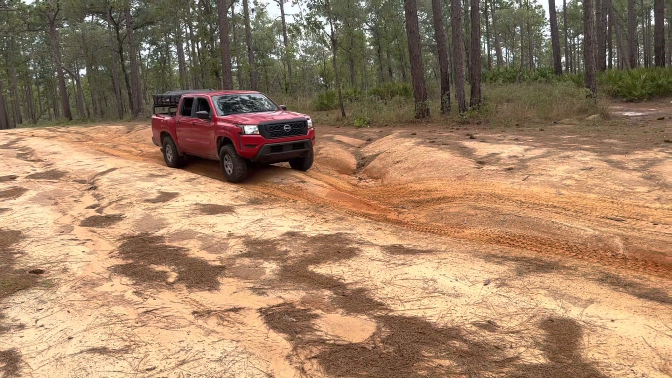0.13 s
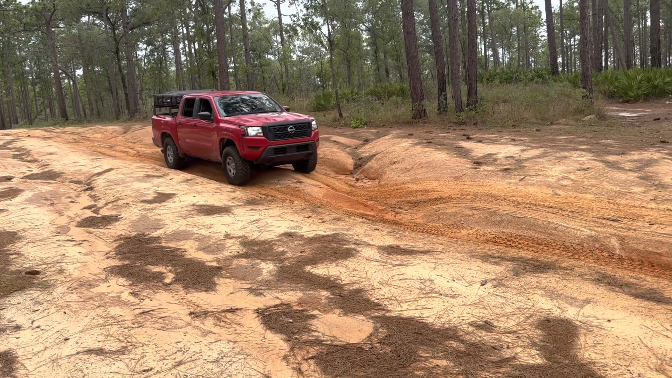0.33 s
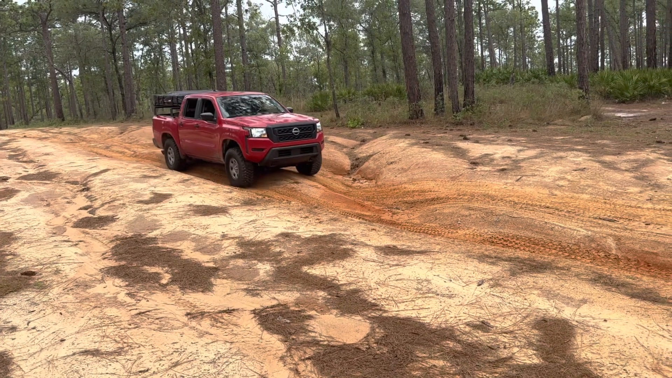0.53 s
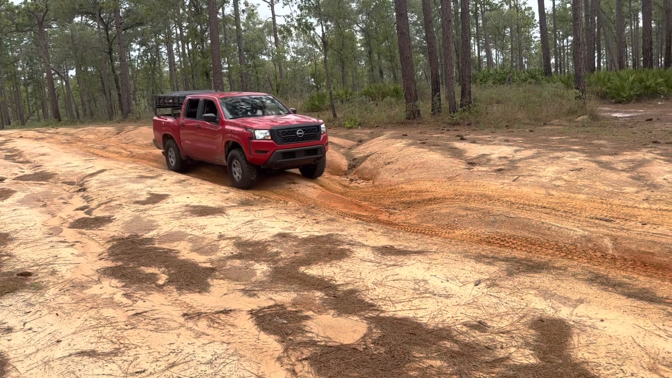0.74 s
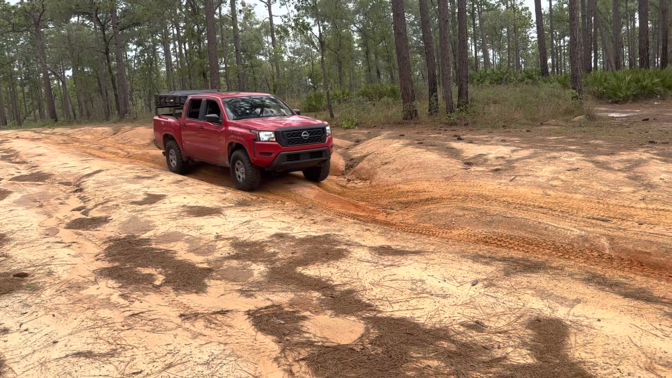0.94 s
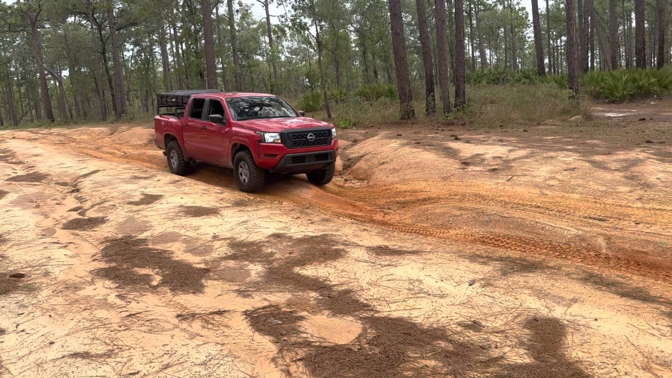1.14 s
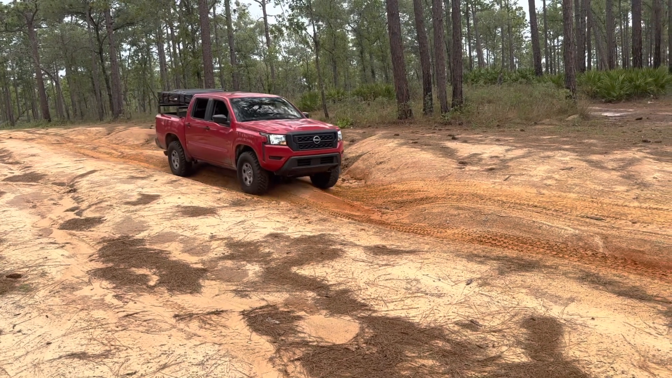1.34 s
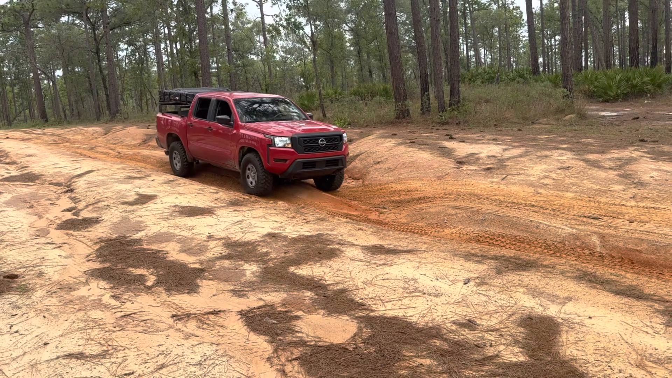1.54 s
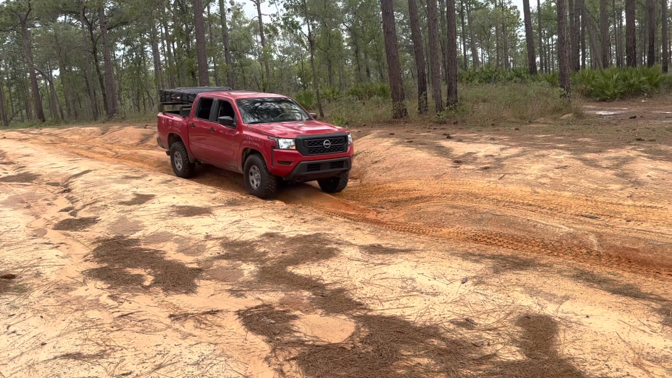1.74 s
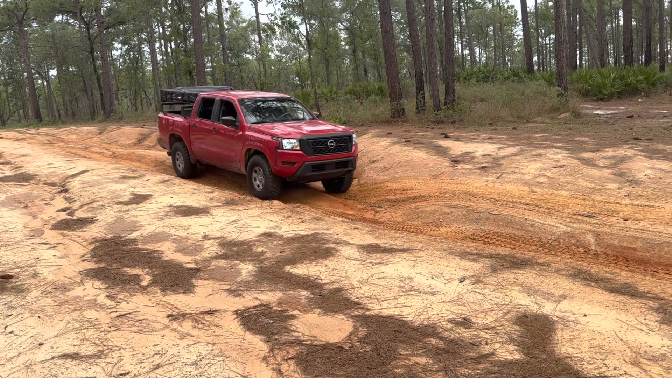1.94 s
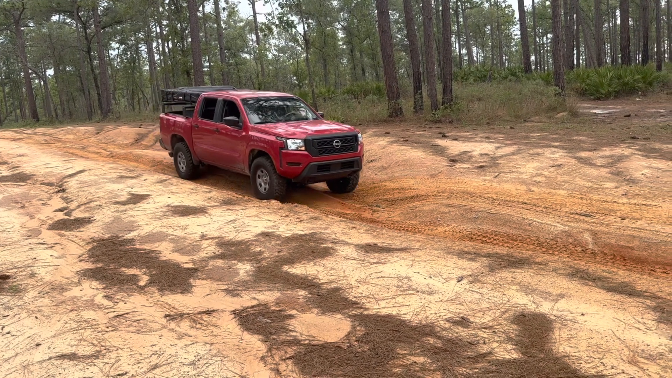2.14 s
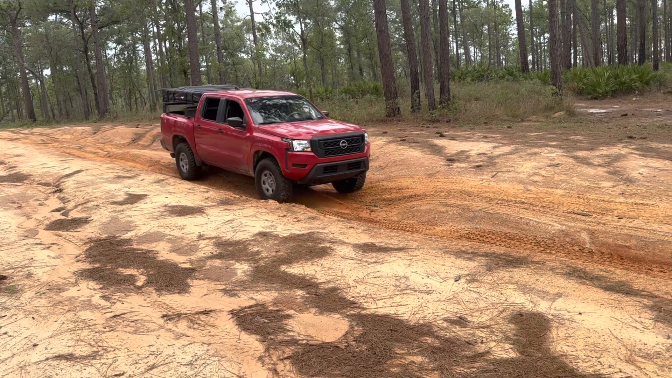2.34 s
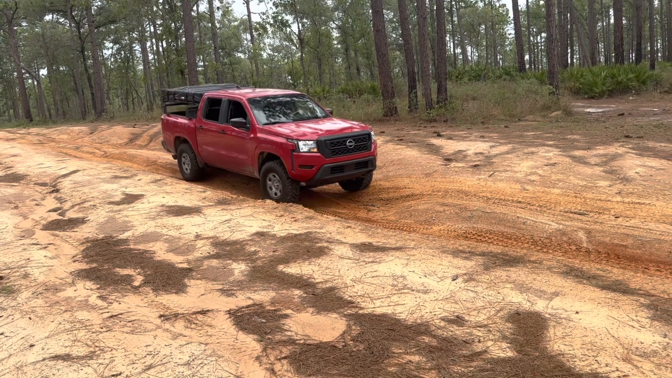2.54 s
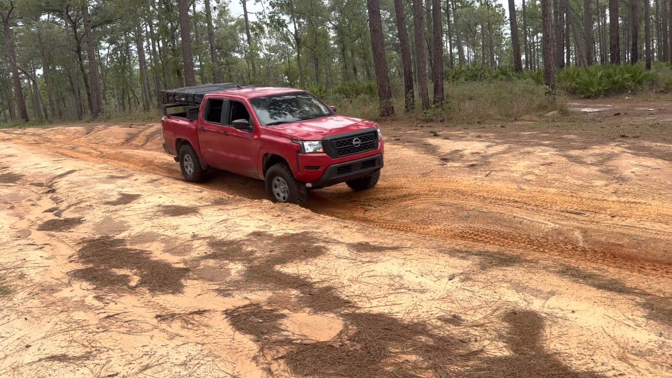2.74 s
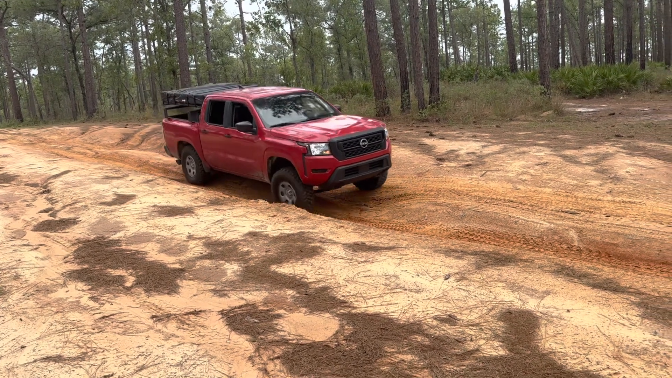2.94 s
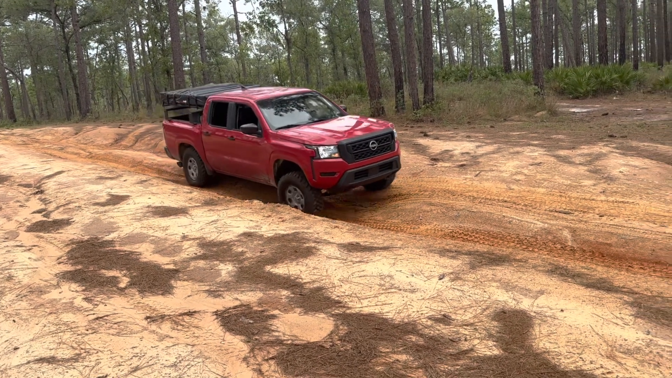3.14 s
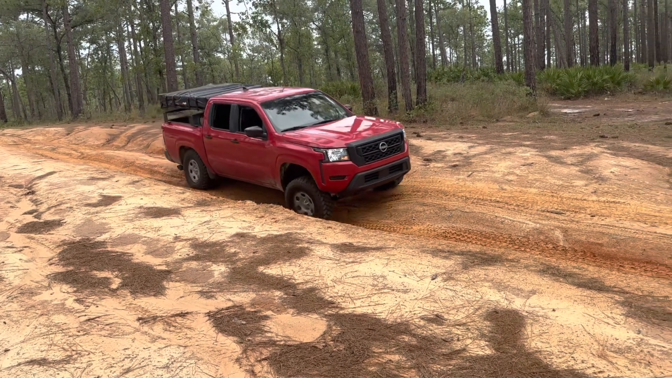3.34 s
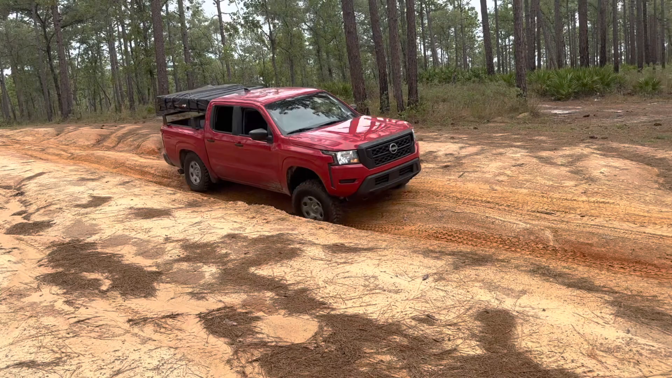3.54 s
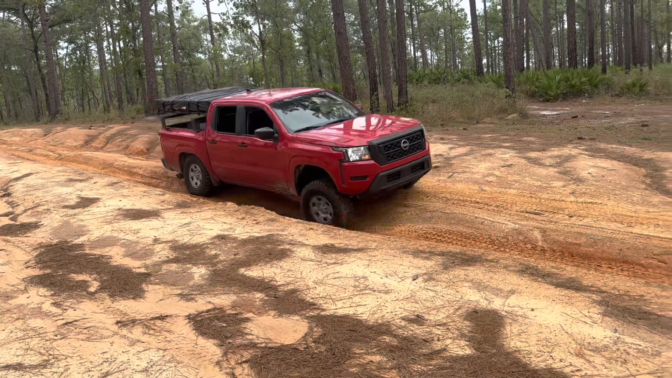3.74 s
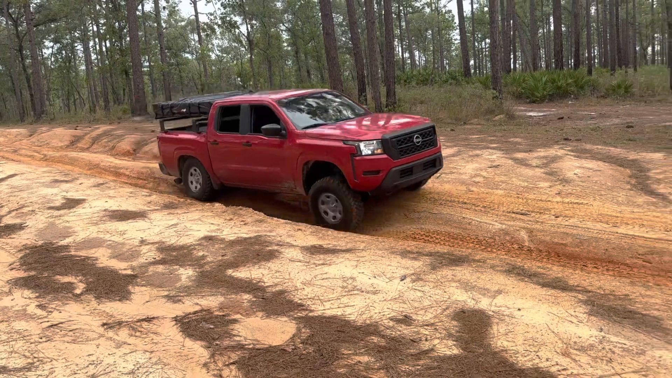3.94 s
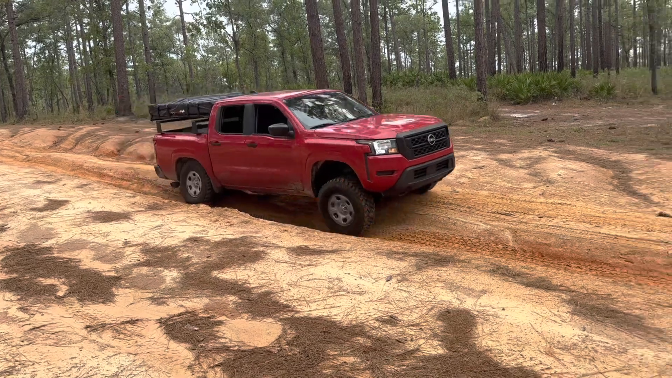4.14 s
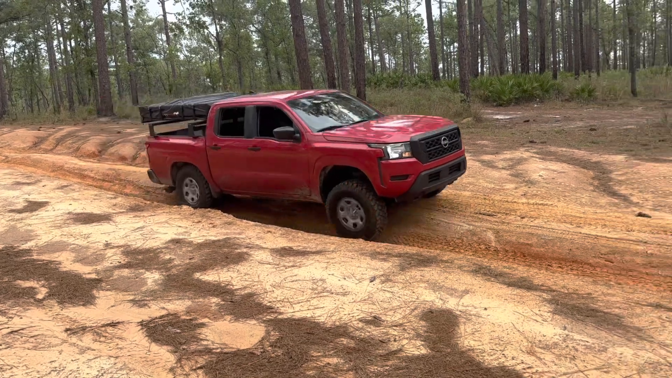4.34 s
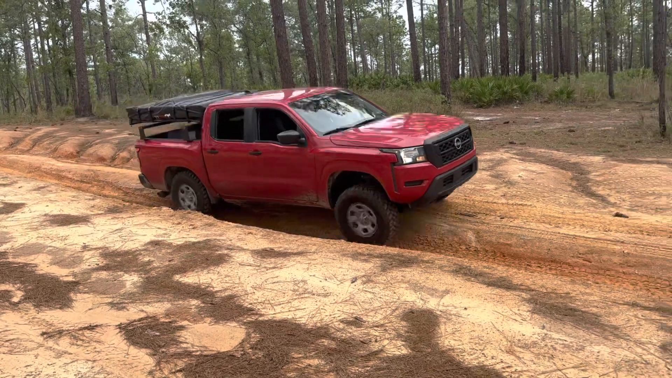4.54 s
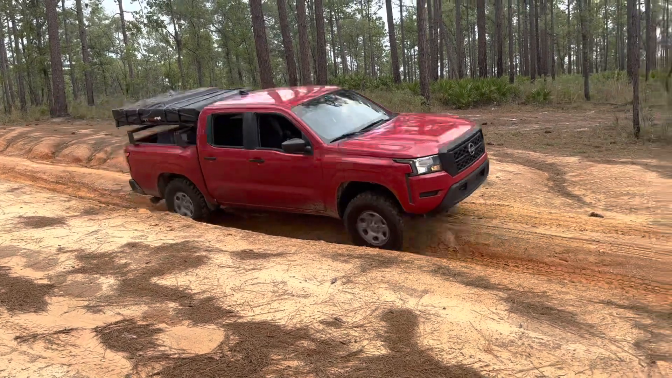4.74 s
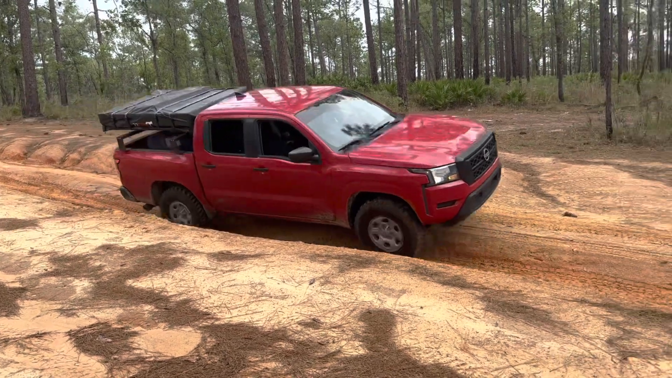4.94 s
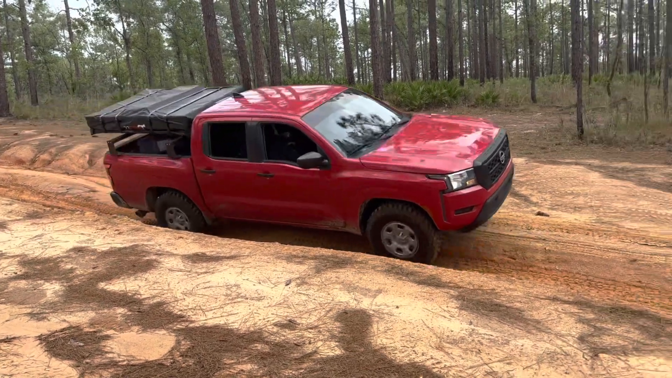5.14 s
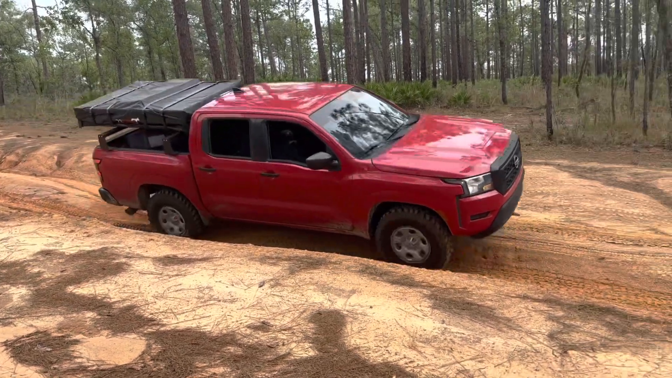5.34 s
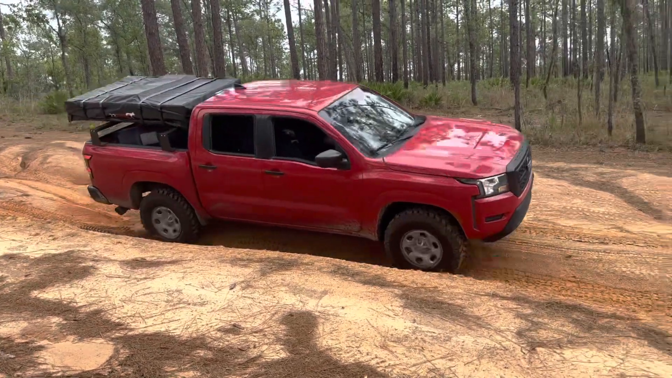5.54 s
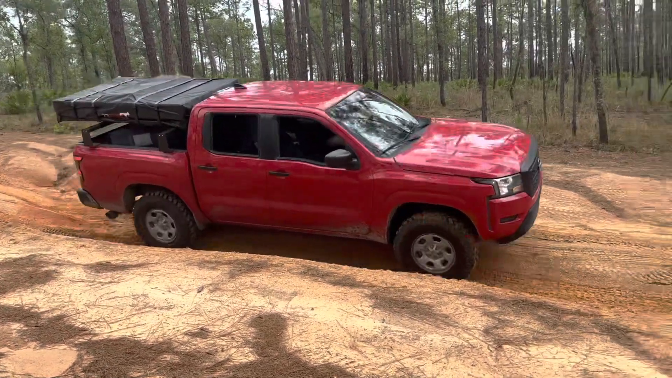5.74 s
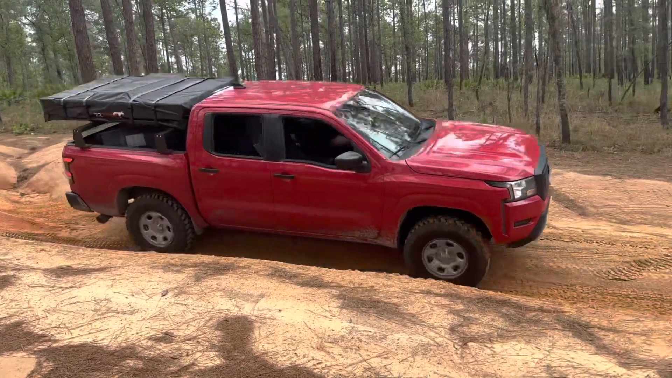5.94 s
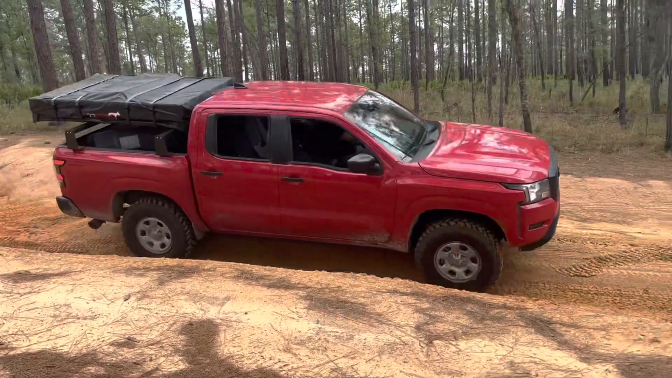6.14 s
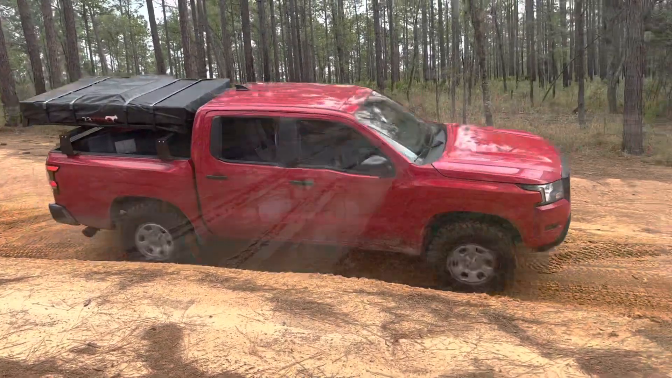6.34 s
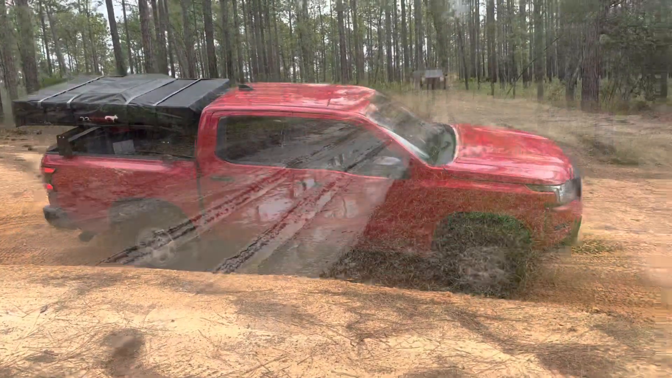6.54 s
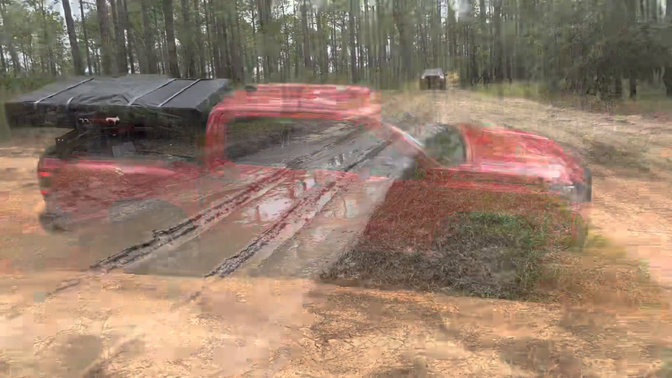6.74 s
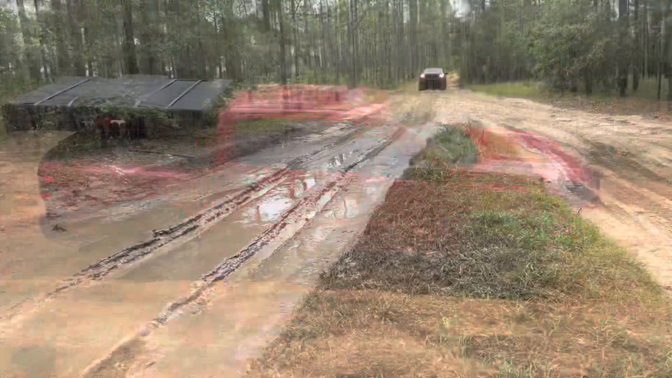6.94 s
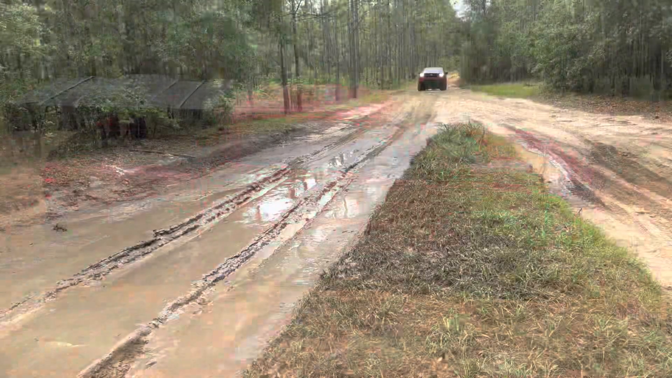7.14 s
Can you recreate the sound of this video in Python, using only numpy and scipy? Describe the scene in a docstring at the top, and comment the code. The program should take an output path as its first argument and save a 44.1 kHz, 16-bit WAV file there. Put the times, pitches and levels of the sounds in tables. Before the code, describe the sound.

Outdoors among trees, with faint crickets behind it, a low, throbbing truck engine approaches at a crawl. It sags at idle, then picks up a little speed, with light ticking and a whirring fan. The tyres hiss and crunch over sand while the body knocks and rattles in the ruts, loudest close to the microphone. Finally the near truck blends into a more distant engine hum.

```python
"""A rutted clay trail in a pine wood. A six-cylinder pickup crawls nearer, idling, then pulling gently.
Its firings make the exhaust hum and the injectors tick, its fan roars, and sand crunches under the tyres.
The ruts make the body knock and ring, while crickets and a katydid sing in the trees.
At the end the sound fades into an engine farther away on another stretch of the trail."""
import sys
import numpy as np
from scipy import signal
from scipy.fft import rfft, irfft
from scipy.io import wavfile
from scipy.ndimage import uniform_filter1d, map_coordinates

SR = 44100
rng = np.random.default_rng(int(sys.argv[2]) if len(sys.argv) > 2 else 0)


def store_pcm(level_fs):
    """Save levels as 16-bit WAV."""
    pcm = np.round(np.clip(level_fs, -1, 1) * 32767).astype(np.int16)
    wavfile.write(sys.argv[1], SR, np.atleast_2d(pcm).T)


N = 317070
TIME = np.arange(N) / SR
FREQS_HZ = np.fft.rfftfreq(N, 1 / SR)

# the near engine's speed, sagging at idle and then picking up: time_s, firings_per_s
ENGINE_SPEED = [(0, 36.4), (.3, 35.7), (.8, 33.3), (1.17, 31.6), (1.6, 32.05), (2.17, 32.3), (2.6, 35.2),
                (3, 39.9), (3.4, 45.2), (3.7, 47.4), (4.1, 49), (4.5, 49.15), (4.95, 50.5), (5.25, 50.6),
                (5.65, 48.2), (6.25, 49), (6.75, 49.9), (7.19, 49.3)]


def gain_of(db):
    """Turns decibels into a number to multiply a sound by."""
    return 10 ** (np.asarray(db) / 20)


def normalised(x):
    """Scales a signal to an average strength (rms) of 1."""
    return x / np.sqrt(np.mean(x ** 2) + 1e-20)


def at_pitch(table, hz):
    """Looks up a table's value at hz, on a scale of octaves."""
    pitches, values = np.transpose(table)
    return np.interp(np.log(hz + 1), np.log(pitches + 1), values)


def over_time(table):
    """Joins a table's points in time with straight lines."""
    return np.interp(TIME, *np.transpose(table))


def wander(rate_hz):
    """A random wobble of strength 1; a higher rate makes it quicker."""
    return normalised(irfft(rfft(rng.standard_normal(N)) * np.exp(-(FREQS_HZ / rate_hz) ** 2), N))


def swell(time_s, half_s):
    """A smooth rise and fall that reaches 1 at time_s."""
    return np.exp(-((TIME - time_s) / half_s) ** 2)


def fuzzy_tone(hz, width_hz):
    """A tone blurred by noise; more width makes it rougher."""
    angle = 2 * np.pi * np.cumsum(hz * np.ones(N)) / SR
    return wander(width_hz) * np.cos(angle) + wander(width_hz) * np.sin(angle)


def shaped_noise(spectrum, source=None, peaks=()):
    """Stereo noise (or a given source) with its lows and highs shaped by a spectrum and extra peaks."""
    # how alike left and right are, 1 being the same: pitch_hz, likeness
    stereo_likeness = [(30, 0.75), (100, 0.94), (300, .97), (600, 0.85), (1300, 0.92), (3000, 0.76),
                       (6000, 0.35), (7500, .96), (8500, .96), (10000, 0.76), (12000, .98), (15500, 0.3)]
    first, second = rfft(rng.standard_normal((2, N)) if source is None else source)
    likeness = at_pitch(stereo_likeness, FREQS_HZ)
    mid, side = first * np.sqrt(1 + likeness), second * np.sqrt(1 - likeness)
    lift = 1 + sum((gain_of(db) - 1) / (1 + (2 * (FREQS_HZ - hz) / width) ** 2) for hz, width, db in peaks)
    shape = lift * gain_of(at_pitch(spectrum, FREQS_HZ))
    return normalised(irfft(np.array([mid + side, mid - side]) * shape, N))


def nearness_db(reference_m=7.5):
    """The truck gains 6 dB each time its distance halves."""
    # the truck's approach: time_s, distance_m
    distance = [(0, 19.1), (2.1, 17.9), (3, 15.7), (3.7, 11.8), (4.5, 8.2), (5.4, 9), (6.3, 6.8)]
    return 20 * np.log10(reference_m / over_time(distance))


def crossfade(start_s=6.365, fade_out_s=0.81, fade_in_s=0.55):
    """Two gains: the near stretch of trail fading out and the far one fading in."""
    since = TIME - start_s
    return np.clip(1 - since / fade_out_s, 0, 1), np.clip(since / fade_in_s, 0, 1)


def near_then_far(near_db, far_db):
    """The gain of a sound that is heard on both stretches."""
    fade_out, fade_in = crossfade()
    return np.hypot(fade_out * gain_of(near_db), fade_in * gain_of(far_db))


def air(level_db=-81):
    """A faint, steady hiss lies over the whole wood."""
    # the hiss: pitch_hz, level_db
    spectrum = [(6000, -2), (9500, 4), (11500, -17), (14500, -14), (16000, -8)]
    return gain_of(level_db) * shaped_noise(spectrum)


def insects(chorus_db=-64, strokes_per_s=47, top_hz=7350, fall_hz=550):
    """Crickets sing to the left, and a katydid buzzes, each wing stroke falling in pitch."""
    # the cricket chorus: pitch_hz, level_db
    cricket_spectrum = [(5500, -48), (6500, -13), (7000, -1), (7500, 5.5), (7850, 2), (8300, -10.5),
                        (9200, -66)]
    # the katydid's buzzes: start_s, end_s, level_db
    buzzes = [(-.05, 0.203, -66.5), (1.046, 1.35, -67.5), (1.332, 1.638, -63)]
    chorus = shaped_noise(cricket_spectrum) * near_then_far(chorus_db, far_db=-69)
    chorus *= gain_of(1.4 * wander(82))
    stroke = TIME * strokes_per_s % 1
    pitch_hz = top_hz - fall_hz * stroke + 110 * wander(660)
    tone = np.sin(2 * np.pi * np.cumsum(pitch_hz) / SR)
    level = sum(gain_of(db) * np.clip(np.minimum(TIME - start, end - TIME) / 0.024, 0, 1)
                for start, end, db in buzzes)
    katydid = level * normalised(tone * np.sin(np.pi * stroke) ** 4)
    return chorus * gain_of([[3], [-3.5]]) + katydid * gain_of([[1], [-1]])


def tree_echo(sound, fall_db_per_s=60, delay_s=0.0011):
    """The trunks scatter the sound into a half-second tail, different on each side."""
    t = np.arange(SR // 2) / SR
    tail = rng.standard_normal((2, len(t))) * gain_of(-fall_db_per_s * t) * (t > delay_s)
    return signal.fftconvolve(sound, tail / np.linalg.norm(tail[0]), axes=1)[:, :N]


def gravel_and_whistle():
    """Gravel grates in two spells, and the fan briefly whistles between them."""
    # gravel, fan whistle, gravel: start_s, end_s, pitch_hz, width_hz, level_db
    spells = [(2.146, 2.952, 2047, 290, -66), (2.553, 3.25, 1093, 70, -66), (3.1, 3.949, 1838, 330, -63.5)]
    out = np.zeros(N)
    for start, end, hz, width_hz, db in spells:
        progress = np.clip((TIME - start) / (end - start), 0, 1)
        out += gain_of(db) * np.sin(np.pi * progress) * fuzzy_tone(hz, width_hz)
    return out


def low_groans():
    """Low groans swell and slide as the truck rolls; the last is the exhaust's overtone ringing out."""
    # the groans: start_s, end_s, first_hz, last_hz, width_hz, level_db
    groans = [(0, 1.073, 306.4, 281, 13, -57.5), (3, 4.198, 429.2, 400.6, 89, -57),
              (3.098, 3.998, 304.7, 297.6, 24, -57), (4.154, 4.615, 360, 328.5, 100, -51),
              (4.397, 5.44, 280, 288, 28, -50.5), (5.71, 6.339, 281, 321.2, 17, -47.5),
              (6.063, 6.642, 323, 317, 14, -47.5), (6.268, 6.912, 292, 302.4, 6, -51.5)]
    out = np.zeros(N)
    for start, end, first_hz, last_hz, width_hz, db in groans:
        progress = np.clip((TIME - start) / (end - start), 0, 1)
        pitch_hz = first_hz + (last_hz - first_hz) * progress
        out += gain_of(db) * np.sin(np.pi * progress) * fuzzy_tone(pitch_hz, width_hz)
    return out


def sand(grains_per_s, spread_db):
    """Grains break with tiny clicks at random moments, a few louder than the rest."""
    sizes = gain_of(spread_db * np.minimum(rng.exponential(1, (2, N)), 4))
    signs = rng.choice([-1, 1], (2, N))
    return normalised(sizes * signs * (rng.random((2, N)) < grains_per_s / SR))


def tyre_grit(hiss_db=-63.5, crunch_db=-62):
    """Sand hisses and crunches under the tyres, louder as they near and where they scuff."""
    # the bright hiss: pitch_hz, level_db
    hiss_spectrum = [(1500, 3), (3500, 3.5), (6500, 10.5), (8500, 7), (10200, 7), (11200, 5), (12600, 1),
                     (14200, 4), (16000, -14)]
    # the duller crunch: pitch_hz, level_db
    crunch_spectrum = [(300, -7), (600, -4), (1100, -2), (1500, 6.5), (1950, 5), (2400, -4), (3500, -9),
                       (6000, -12), (12000, -46)]
    # tyres rubbing the sides of the rut: time_s, half_length_s, extra_hiss_db, extra_crunch_db
    scuffs = [(2.4, 0.2, 2, -0.5), (3.45, 1, 0.5, 2), (4.117, 0.39, 4, 0), (6.297, 0.4, 5, 0.5)]
    hiss_db += 0.73 * nearness_db()
    crunch_db += nearness_db()
    for time_s, half_s, extra_hiss_db, extra_crunch_db in scuffs:
        hiss_db += extra_hiss_db * swell(time_s, half_s)
        crunch_db += extra_crunch_db * swell(time_s, half_s)
    spray = rng.standard_normal((2, N)) + 0.41 * sand(grains_per_s=2900, spread_db=6)
    hiss = shaped_noise(hiss_spectrum, spray) * near_then_far(hiss_db, far_db=-66.5)
    grains = sand(grains_per_s=900, spread_db=1.5)
    crunch = shaped_noise(crunch_spectrum, grains) * near_then_far(crunch_db, far_db=-74)
    return hiss * gain_of(wander(40)) + crunch * gain_of(2.2 * wander(40))


def frame_rumble(level_db=-47):
    """The frame rumbles more as the truck nears and picks up speed."""
    # the rumble: pitch_hz, level_db
    spectrum = [(15, -35), (35, -31), (70, 6), (130, 4), (180, 3.5), (240, 1.5), (300, -3), (370, -3),
                (520, -7), (650, -14.5), (1000, -29.5), (2500, -64)]
    near_db = level_db + 0.43 * nearness_db() + 10 * np.log10(over_time(ENGINE_SPEED) / 50)
    return shaped_noise(spectrum) * near_then_far(near_db, far_db=-44.5) * gain_of(0.54 * wander(21))


def rut_thumps(steady_db=-50):
    """A tyre thumps softly as it takes the weight, briefly raising a low rumble that is always there."""
    # tyres dropping into ruts: time_s, thump_db, pitch_hz, half_length_s, rumble_db
    drops = [(0.936, -39, 57.5, 0.019, -60), (1.977, -39, 60, 0.04, -45), (2.409, -36, 56, .03, -44),
             (2.62, -43, 50, .025, -60), (3.792, -35, 55, .019, -48), (4.155, -41, 55, 0.038, -53),
             (4.967, -21.5, 78, .012, -48), (5.018, -41, 62, .017, -39), (5.397, -31, 58, 0.028, -39),
             (5.59, -33, 81.5, .0094, -33.5), (5.719, -33, 64.4, 0.029, -41), (5.886, -28, 52, .032, -34),
             (6.251, -23, 74, 0.0098, -44), (6.704, -33, 61.4, 0.022, -36.5)]
    # the low rumble: pitch_hz, level_db
    rumble_spectrum = [(10, -45), (24, -26), (32, 0), (42, 0), (52, 12), (75, 9), (100, 6.5), (150, -1.5),
                       (400, -65)]
    thumps = np.zeros(N)
    power = near_then_far(steady_db + 0.035 * nearness_db(), far_db=-47) ** 2
    for time_s, thump_db, hz, half_s, rumble_db in drops:
        thumps += gain_of(thump_db) * swell(time_s, half_s) * np.cos(2 * np.pi * hz * (TIME - time_s))
        power += (gain_of(rumble_db) * swell(time_s, half_s=0.14)) ** 2
    rumble = shaped_noise(rumble_spectrum)
    rumble /= np.sqrt(uniform_filter1d((rumble ** 2).mean(0), SR // 20) + 1e-9)  # evens out random swells
    return thumps + rumble * np.sqrt(power)


def belt_whirr(level_db=-56.5, turn_s=4.14, fade_db_per_s=9):
    """Belts and valves make the engine bay ring; the whirr fades as the grille turns away."""
    # where the bay rings: pitch_hz, width_hz, level_db
    resonances = [(811, 38, 9.5), (960, 125, 4), (1457, 115, 6.5), (1750, 87, -20), (2010, 240, 6),
                  (2930, 440, 2.5), (3295, 32, 4), (3960, 98, -3), (4850, 140, 1)]
    power = sum(gain_of(db) ** 2 / (1 + ((FREQS_HZ - hz) / width) ** 2) ** 2 for hz, width, db in resonances)
    spectrum = np.column_stack([FREQS_HZ, 10 * np.log10(power)])
    near_db = level_db + nearness_db() - fade_db_per_s * np.maximum(TIME - turn_s, 0)
    return shaped_noise(spectrum) * near_then_far(near_db, far_db=-62)


def fan_roar(level_db=-53):
    """The fan turns with the engine, so it roars louder as the engine speeds up."""
    # the roar: pitch_hz, level_db
    spectrum = [(300, -8), (720, -6.5), (900, -3.5), (1080, 2), (1220, -2.5), (1500, -1), (1900, -4.5),
                (2400, -7), (3000, -10), (3600, -11.5), (4250, -11.5), (5100, -14), (5700, -26.5),
                (9000, -53)]
    # thin whistles in the roar: pitch_hz, width_hz, boost_db
    whistles = [(1046, 310, 4), (1294, 37, 2.5), (1824, 33, 8.5), (2033, 7.2, 12), (2444, 73, 7),
                (4260, 200, 6), (5200, 52, 10.5), (5750, 89, 17), (7200, 55, 8)]
    near_db = level_db + nearness_db() + 25 * np.log10(over_time(ENGINE_SPEED) / 50)
    roar = shaped_noise(spectrum, peaks=whistles) * near_then_far(near_db, far_db=-58)
    return roar * gain_of(0.7 * wander(28)) * gain_of([[-.3], [.3]])


def injector_ticks(level_db=-63.5, rise_s=0.003, decay_s=0.01):
    """The fuel injectors give one metallic tick of uneven strength at each firing."""
    # a tick: pitch_hz, level_db
    spectrum = [(2000, -27), (3000, -2), (3600, -26), (4200, -4.5), (4500, -32), (5000, 0.5), (5500, -24.5),
                (8500, -10), (9500, -3.5), (10300, -5), (11200, -17), (16000, -17)]
    firing_hz = over_time(ENGINE_SPEED)
    since_firing = (np.cumsum(firing_hz) / SR % 1) / firing_hz
    strength = gain_of(1.3 * wander(30))
    ticks = strength * (1 - np.exp(-since_firing / rise_s)) * np.exp(-since_firing / decay_s)
    level = near_then_far(level_db + 0.56 * nearness_db(), far_db=-70.5)
    return shaped_noise(spectrum) * normalised(ticks) * level


def body_knocks(boom_rise_s=0.0042, rise_s=0.0015, crack_fade_s=0.082):
    """Each jolt rings the body and a loose panel, rattles, cracks in the suspension and scrapes grit."""
    # the jolts (a fade is the time to fall by 60 dB):
    # time_s, boom_db, panel_db, panel_hz, rattle_db, crack_db, scrape_db, fade_s
    jolts = [(.672, -70, -60, 500, -65, -70, -53.5, .11), (.712, -62, -45, 472, -49, -66, -59, 0.086),
             (0.722, -57, -36.5, 547, -60, -58, -54, 0.083), (.742, -66, -44.5, 504, -58, -66, -72, 0.14),
             (2.029, -42, -59, 400, -62, -73, -75, .16), (2.228, -68, -52, 3800, -66, -64, -53, 0.14),
             (2.325, -58, -44, 1144, -54, -53, -48, 0.051), (2.344, -60, -38, 550, -41, -64, -69, 0.046),
             (3.134, -60, -41.5, 408, -50, -57, -62, 0.29),
             (3.589, -34.5, -31, 449, -39, -41.5, -65, 0.098), (3.63, -32, -34, 388, -49, -52, -62, 0.16),
             (3.748, -32, -45, 302, -56, -52, -55, 0.12), (4.357, -42, -34, 333, -47, -44, -42, .1),
             (4.371, -56, -38, 503, -45, -52, -64, 0.22), (4.393, -50, -41, 488, -55, -48, -75, 0.16),
             (5.113, -34.5, -45, 850, -54, -43, -63, .13), (5.141, -56, -48, 950, -55, -46, -69, .094),
             (5.463, -36, -39, 1140, -50, -37.5, -52, .059), (5.572, -22, -34, 318, -47, -33.5, -55, .076),
             (5.58, -13, -31, 250, -45, -39, -55, 0.15), (5.597, -29, -32, 244, -49, -46, -59, 0.23),
             (5.645, -19.5, -33, 257, -46, -58, -63, 0.34), (6.586, -32, -40, 390, -39, -54, -54, 0.087),
             (7.15, -53, -33.5, 338, -42.5, -65, -54, 0.17)]
    # the notes the body rings with: pitch_hz, level_db, fade_s
    body_notes = [(164, -9.5, 0.24), (216.4, -1, 0.14), (279, -13.5, 0.065), (1000, -33, 0.2),
                  (1320, -36, 0.15), (1850, -51, .15)]
    # the dull rattle: pitch_hz, level_db
    rattle_spectrum = [(20, -25), (150, 0), (330, 15), (520, 0.5), (700, -10), (1000, -22), (1500, -34),
                       (2500, -47), (5000, -39)]
    # the gritty scrape: pitch_hz, level_db
    scrape_spectrum = [(400, 2.5), (1200, 3), (2200, 4.5), (4000, -1), (6200, -1.5), (10000, -27),
                       (16000, -45)]
    # the hard crack: pitch_hz, level_db
    crack_spectrum = [(300, 4.5), (650, -1.5), (900, -7), (1100, 3), (1350, -4), (1600, -6.5),
                      (2200, -12.5), (3200, -25), (5000, -33)]
    boom, rattle, scrape, panel, crack = np.zeros((5, N))
    t = np.arange(SR // 2) / SR
    ring = sum(gain_of(db - 60 * t / fade_s) * np.sin(2 * np.pi * hz * t) for hz, db, fade_s in body_notes)
    ring *= 1 - np.exp(-t / boom_rise_s)
    onset = 1 - np.exp(-t / rise_s)
    for time_s, boom_db, panel_db, panel_hz, rattle_db, crack_db, scrape_db, fade_s in jolts:
        dying = onset * gain_of(-60 * t / fade_s)
        add(boom, time_s, gain_of(boom_db) * ring)
        add(crack, time_s, onset * gain_of(crack_db - 60 * t / crack_fade_s))
        add(panel, time_s, gain_of(panel_db) * dying * np.sin(2 * np.pi * panel_hz * t))
        add(rattle, time_s, gain_of(rattle_db) * dying)
        add(scrape, time_s, gain_of(scrape_db) * dying)
    panel *= 0.63 + 0.14 * wander(55)  # roughens the panel's note
    return (boom + panel + rattle * shaped_noise(rattle_spectrum)
            + scrape * shaped_noise(scrape_spectrum) + crack * shaped_noise(crack_spectrum))


def add(mix, time_s, sound):
    """Mixes a sound in, starting at time_s."""
    part = mix[round(time_s * SR):][:len(sound)]
    part += sound[:len(part)]


def pipe_hum(firing_hz, first_multiple, levels_db, pipe):
    """Exhaust pulses make a stack of tones above the firing rate; the pipe favours some of them."""
    firings = 1 + np.cumsum(firing_hz) / SR + .004 * wander(14)
    multiples = first_multiple + np.arange(len(levels_db))[:, None]
    hz = multiples * firing_hz
    idling = 1 - firing_hz / firing_hz.max()
    dulling_db = 10 * idling * np.log2(np.maximum(hz / 115, 1))  # slow, soft pulses have weaker highs
    gains = gain_of(np.array(levels_db)[:, None] + at_pitch(pipe, hz) - dulling_db)
    hum = (gains * np.cos(2 * np.pi * multiples * firings)).sum(0)
    return hum / np.sqrt((gains ** 2).sum(0) / 2)


def exhaust(flutter_db=1.0):
    """The near engine hums and, as its two cylinder banks are uneven, throbs; then the far one takes over."""
    # the hum's tones at 1, 2, 3... times the firing rate: level_db
    hum_tones = [0, 0, -1.5, -13.5, -11.5, -18, -19, -25, -27.5]
    # the throb's tones at 1.5, 2.5, 3.5... times the firing rate: level_db
    throb_tones = [-12, -0.5, 5, -26, -13, -27]
    # what the near exhaust pipe lets through: pitch_hz, level_db
    near_pipe = [(30, -18), (50, -11.5), (68, -8), (82, -2), (99, 6), (110, 3), (124, -3), (148, -34),
                 (175, -21.5), (200, 6.5), (225, -10), (250, -11), (300, -0.5), (400, -26), (700, -40)]
    # how hard the near engine works: time_s, level_db
    throttle = [(0, -36.5), (.2, -34.5), (.6, -27.5), (.87, -31), (1.7, -34), (2.57, -34), (2.8, -41),
                (3, -42), (3.25, -40), (4, -32), (4.6, -34.5), (4.85, -30), (5.08, -31.5), (6, -32.5),
                (6.3, -35.5)]
    # how strongly it throbs: time_s, level_db
    unevenness = [(0, -47), (.3, -43), (.7, -52.5), (1.2, -51.5), (1.7, -57), (2.7, -49.5), (3.2, -47.5),
                  (4.2, -43.5), (6.3, -48.5)]
    # what the far exhaust pipe lets through: pitch_hz, level_db
    far_pipe = [(40, -24), (55, -12), (82, 2), (124, 10), (167, -7), (208, 3), (250, 4.5), (300, 3.5),
                (340, 8), (420, -9), (700, -30)]
    # the far engine's speed: time_s, firings_per_s
    far_speed = [(6.4, 40.3), (6.66, 40.9), (6.8, 41.7), (6.92, 42.2), (7.02, 41.6), (7.11, 40.5),
                 (7.19, 39.8)]
    # how hard the far engine works: time_s, level_db
    far_throttle = [(6.55, -32.5), (6.64, -27.5), (6.74, -29), (6.92, -31.5), (7.08, -33), (7.19, -35)]
    firing_hz = over_time(ENGINE_SPEED)
    hum = pipe_hum(firing_hz, 1, hum_tones, near_pipe) * gain_of(over_time(throttle) + nearness_db())
    throb = pipe_hum(firing_hz, 1.5, throb_tones, near_pipe) * gain_of(over_time(unevenness))
    far = pipe_hum(over_time(far_speed), 1, hum_tones, far_pipe) * gain_of(over_time(far_throttle))
    fade_out, fade_in = crossfade()
    engines = fade_out * (hum + throb) + fade_in * far
    return engines * gain_of(flutter_db * wander(19)) * gain_of([[.35], [-.35]])


def left_to_right(sound):
    """As the truck crosses, its sound reaches the nearer microphone a little earlier."""
    # how much later the right side hears it: time_s, delay_s
    right_delay = [(0, 45e-6), (1.5, 38e-6), (3, 22e-6), (4.8, -10e-6), (6.3, -25e-6), (6.9, 0)]
    right = map_coordinates(sound[1], [(TIME - over_time(right_delay)) * SR], mode="nearest")
    return np.array([sound[0], right])


def scene():
    """The truck, its faint echo and the wood around it."""
    truck = exhaust() + body_knocks()
    machinery = belt_whirr() + fan_roar()
    driving = low_groans() + gravel_and_whistle() + frame_rumble() + rut_thumps()
    direct = left_to_right(truck + machinery + driving)
    echo = gain_of(-26) * tree_echo(truck)
    return direct + echo + injector_ticks() + tyre_grit() + insects() + air()


def record(dry):
    """The two microphones differ a little in timing and level, and the highest treble is cut."""
    # how far the left side's wave runs ahead: pitch_hz, lead_radians
    left_lead = [(100, 0), (500, 0), (620, .2), (740, -.35), (1500, -.38), (2300, -.15), (3000, .2),
                 (3600, .85), (4150, .4), (4650, 1), (5050, .2), (5450, .9), (6100, .1), (7400, 1.8),
                 (8500, 3.1), (9200, 1.5), (10000, .8), (10400, 0), (13400, 0), (15000, -1.6)]
    # how much louder the left side is: pitch_hz, level_db
    left_boost = [(100, .2), (200, .6), (550, 0), (680, 3.3), (930, 0), (1900, -.3), (3400, -3.5),
                  (3850, -1.5), (4300, -3), (4850, 1.5), (5250, -1), (5900, 2), (7000, 0)]
    sides = np.array([[.5], [-.5]])
    phase_shift = np.exp(1j * sides * at_pitch(left_lead, FREQS_HZ))
    balance = gain_of(sides * at_pitch(left_boost, FREQS_HZ))
    stereo = irfft(rfft(dry) * phase_shift * balance, N)
    treble_cut = signal.firwin(511, cutoff=15400, window=("kaiser", 9), fs=SR)
    return signal.oaconvolve(stereo, treble_cut[None], "same")


dry = scene()
out = record(dry)
store_pcm(out)
```